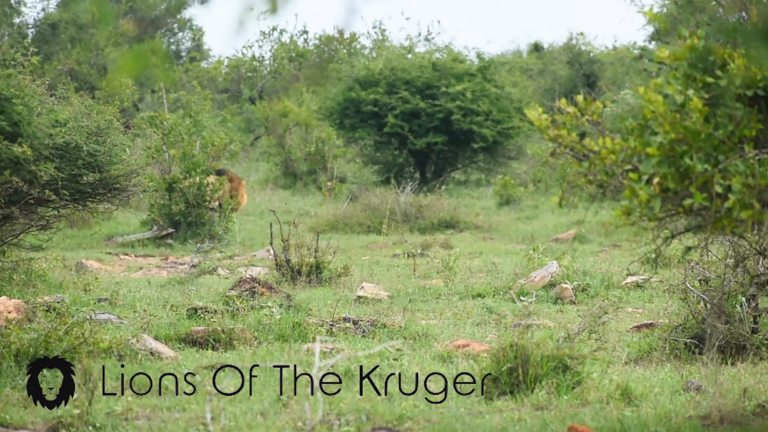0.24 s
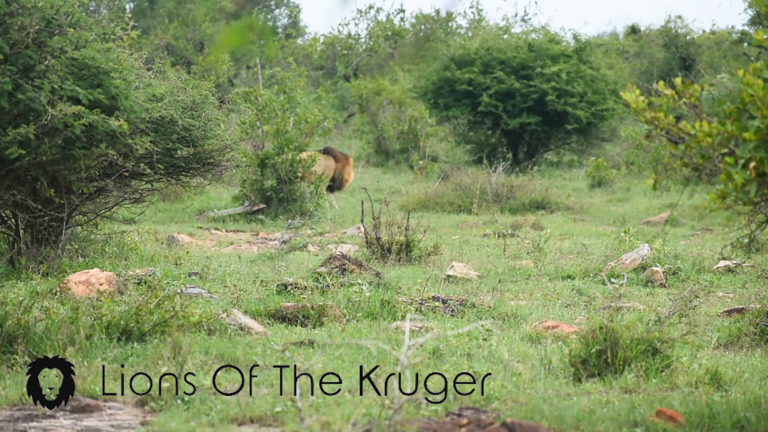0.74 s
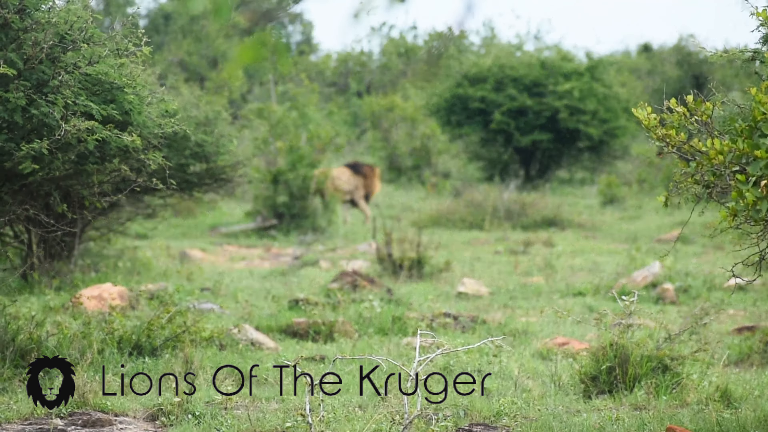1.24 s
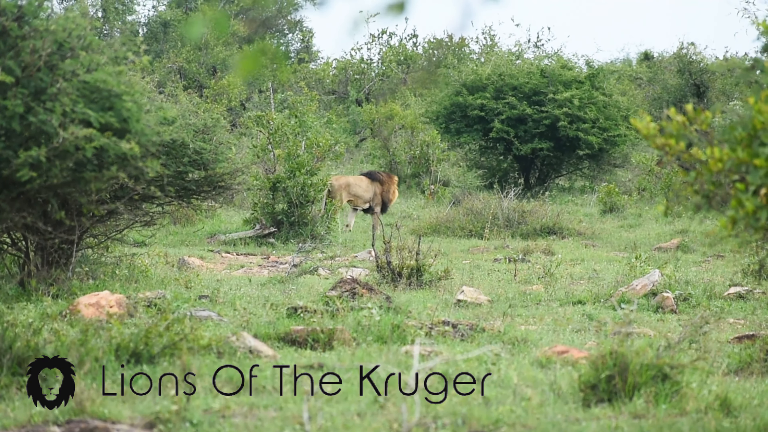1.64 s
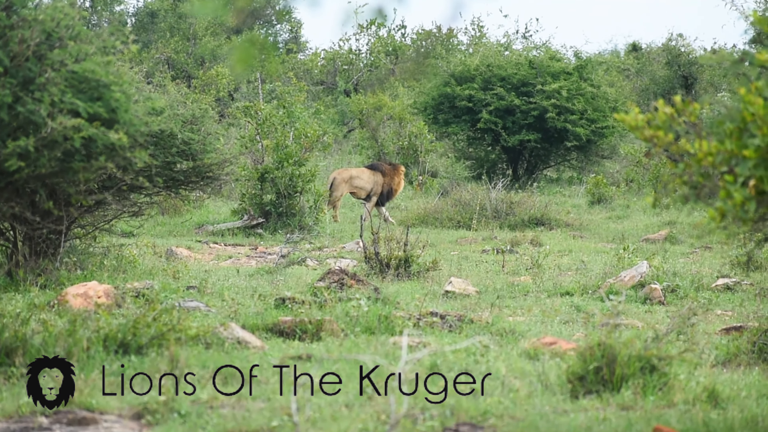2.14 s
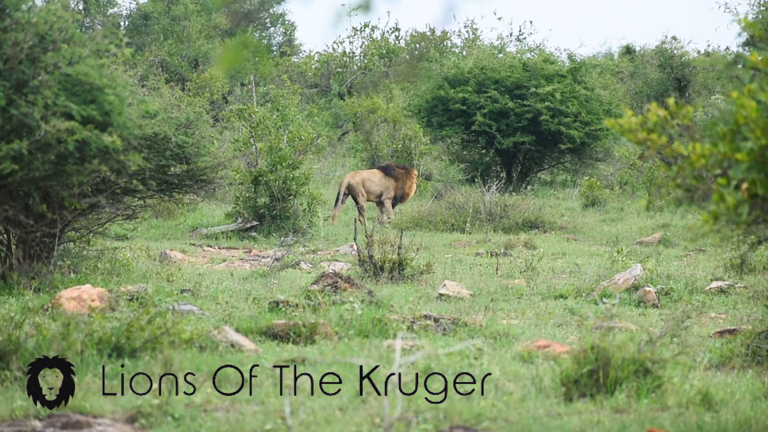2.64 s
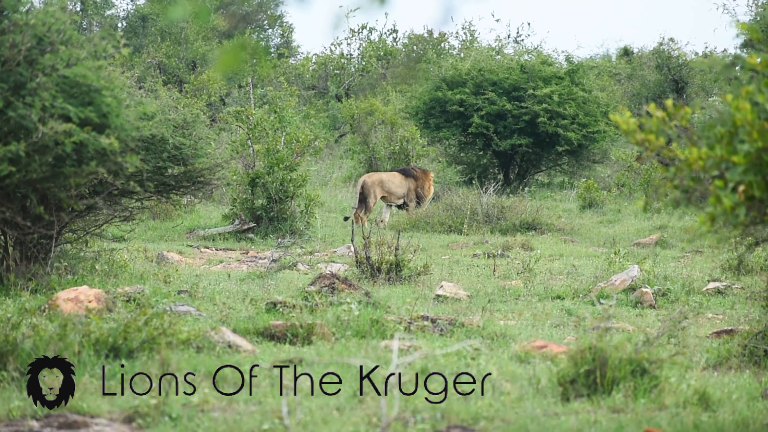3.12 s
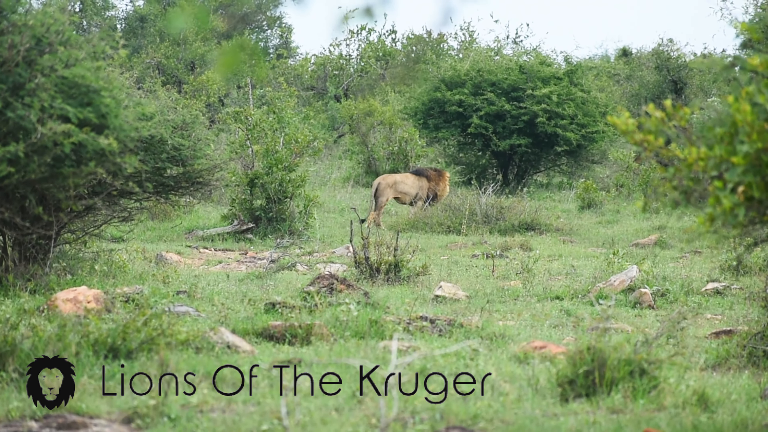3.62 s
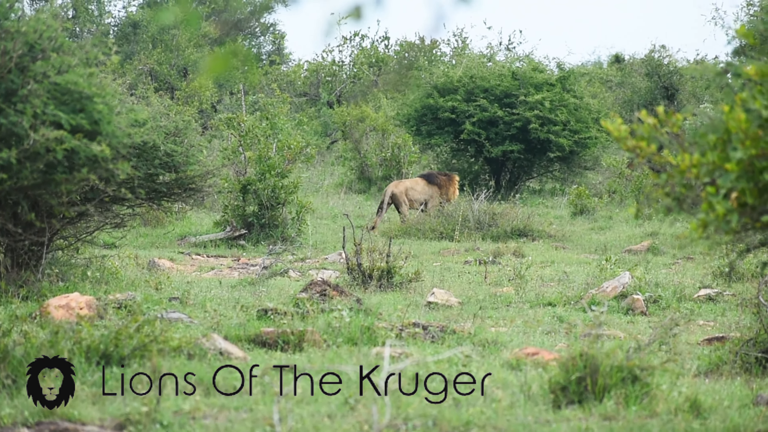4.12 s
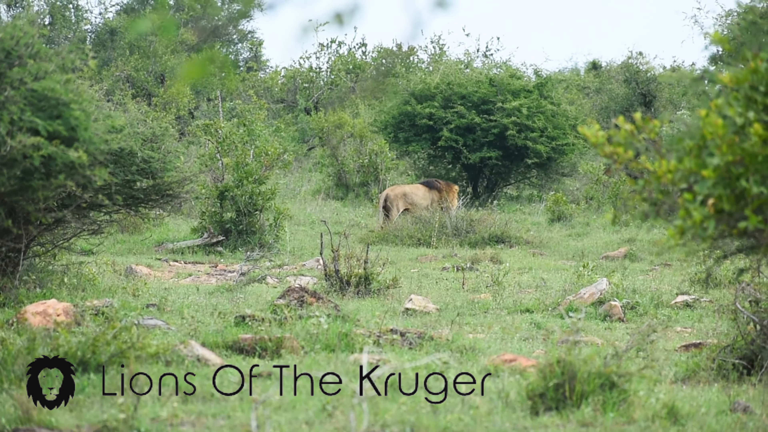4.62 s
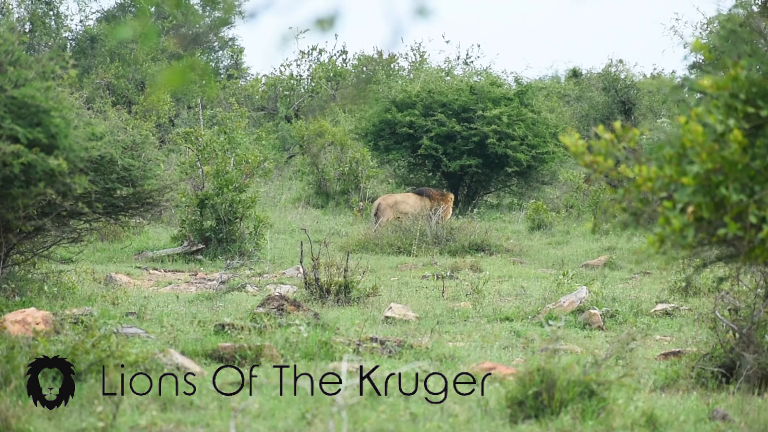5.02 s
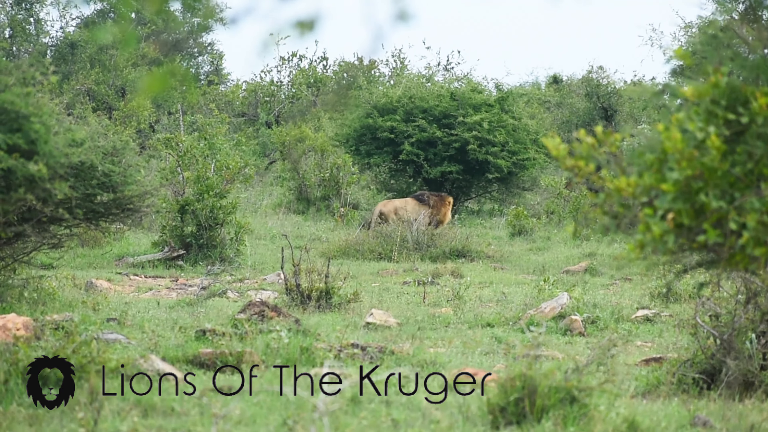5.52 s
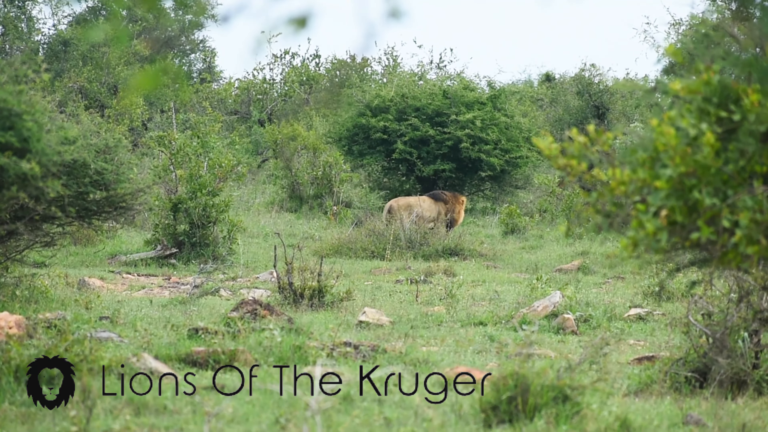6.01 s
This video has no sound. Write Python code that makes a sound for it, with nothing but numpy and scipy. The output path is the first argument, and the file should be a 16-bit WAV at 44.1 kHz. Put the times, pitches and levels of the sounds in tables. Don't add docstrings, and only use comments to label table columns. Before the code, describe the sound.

Open daytime bush on a small, hissy microphone in wind. A bright insect chirr throbs throughout, with a thin, higher cricket scraping double strokes about four times a second. Heavy low thumps open the scene; a hoarse bird slides downward, then a near bird gives five sharp chirps around two seconds. Dry wing snaps tick at random, faint birds whistle later, and wind bumps return at the end.

```python
import sys
import numpy as np
from scipy import signal
from scipy.fft import rfft, irfft, next_fast_len
from scipy.io import wavfile
from scipy.ndimage import uniform_filter1d

SR = 44100
rng = np.random.default_rng(int(sys.argv[2]) if len(sys.argv) > 2 else 0)


def undo_db(level):
    steps = np.asarray(level, float) / 20
    return 10 ** steps


def unload_wav(signal):
    wavfile.write(
        sys.argv[1],
        SR,
        np.round(np.clip(np.atleast_2d(signal).T, -1, 1) * 32767).astype(np.int16),
    )


N = 276198


def level(x, db):
    return x * undo_db(db) / np.sqrt(np.mean(x ** 2))


def curve(table):
    s, *columns = np.transpose(table)
    return [np.interp(np.arange(N) / SR, s, c) for c in columns]


def band(x, lo_hz, hi_hz, order=2):
    return signal.sosfilt(signal.butter(order, [lo_hz, hi_hz], "band", fs=SR, output="sos"), x)


def walk(rate):
    hold = int(SR / rate)
    steps = np.repeat(rng.standard_normal(N // hold + 1), hold)
    return 2.3 * uniform_filter1d(uniform_filter1d(steps, hold), hold)[:N]


def add(out, start, length, hz, db, turn, soft=1.67, fade=0, lean=1):
    u = np.linspace(0, 1, max(int(length * SR), 8))
    pitch = np.polyval(np.polyfit([0, .5, 1], hz, deg=2), u)
    shape = np.abs(np.sin(np.pi * u ** lean)) ** soft * (1 - fade * u ** 3)
    note = undo_db(db) * shape * np.sin(2 * np.pi * (np.cumsum(pitch) / SR + turn))
    at = int(start * SR) + np.arange(len(u))
    inside = (at >= 0) & (at < N)
    out[at[inside]] += note[inside]


def blips(table, cycles, glide, trim_db, lean=1, push=False):
    out = np.zeros(N)
    turns = rng.random(len(table))
    for (s, db, hz), turn, stretch in zip(table, turns, np.broadcast_to(cycles, len(table))):
        length = stretch / hz
        start = s - length * .5 ** (1 / lean)
        if push:
            turn = 1 / 4 - stretch / 2 * (1 + glide / 2)
        add(out, start, length, hz * np.array([1 + glide, 1, 1 - glide]), db + trim_db, turn, lean=lean)
    return out


def hiss():
    # f/Hz, level per Hz/dB
    spectrum = [(60, -18), (150, 2), (419, -1.5), (630, -3.5), (859, -4.5), (1020, -5.5), (1600, -8),
                (3210, -10.5), (4470, -9.5), (5220, -5), (6460, -12), (13200, -31), (15400, -37)]
    hz, db = np.transpose(spectrum)
    size = next_fast_len(N)
    bins = np.maximum(np.arange(size // 2 + 1) * SR / size, 1)
    tilt = undo_db(np.interp(np.log(bins), np.log(hz), db))
    return level(irfft(rfft(rng.standard_normal(size)) * tilt, size)[:N], -50)


def far_cricket():
    # t/s, peak/dB
    far_chirps = [(0.0238, -61), (0.2633, -65), (0.5018, -64), (0.7447, -63), (0.9994, -68), (1.2331, -62),
                  (2.809, -68), (3.5794, -67), (3.8043, -65), (4.0213, -64), (4.2767, -65), (4.5314, -66),
                  (4.7652, -66), (5.025, -64), (5.2739, -65), (5.4906, -65), (5.771, -65), (6.0122, -65)]
    dash, rustle, t = np.zeros(N), np.zeros(N), np.arange(N) / SR
    for s, db in far_chirps:
        dash += undo_db(db + 1.5) * np.exp(-((t - s - .032) / .042) ** 4)
        rustle += undo_db(db - 11.0) * np.exp(-((t - s - .03) / 0.15) ** 2)
    noise = rng.standard_normal((2, N))
    return dash * level(band(noise[0], 7240, 7550), 0) + rustle * level(band(noise[1], 7500, 7900), 0)


def glides(table, soft, arch_hz=0):
    out = np.zeros(N)
    for (s, length, first, last, db), turn in zip(table, rng.random(len(table))):
        add(out, s, length, (first, (first + last) / 2 + arch_hz, last), db, turn, soft=soft)
    return out


def whistle(table):
    hz, db = curve(table)
    return undo_db(db) * np.sin(2 * np.pi * np.cumsum(hz) / SR)


def clear_birds():
    # start t/s, length/s, peak/dB
    near_chirps = [
        (1.778, 0.025, -34.5),
        (1.911, .023, -30.5),
        (1.986, 0.029, -31.5),
        (2.155, 0.021, -31),
        (2.23, 0.026, -30.5),
    ]
    # start t/s, length/s, first f/Hz, last f/Hz, peak/dB
    arched = [
        (4.24, 0.2, 2560, 2790, -62),
        (4.641, 0.169, 2750, 2820, -57.5),
    ]
    # t/s, f/Hz, level/dB
    climb = [
        (5.595, 2250, -80),
        (5.612, 2400, -64),
        (5.645, 2780, -61),
        (5.68, 2900, -59),
        (5.705, 3070, -58),
        (5.73, 3300, -63),
        (5.75, 3400, -80),
    ]
    out = np.zeros(N)
    for (s, length, db), turn in zip(near_chirps, rng.random(len(near_chirps))):
        add(out, s, length, (5190, 4857, 4550), db, turn, soft=.8)
    return out + glides(arched, .3, arch_hz=140) + whistle(climb)


def far_birds():
    # start t/s, middle f/Hz, peak/dB
    chips = [(.827, 3800, -53), (2.341, 3950, -47), (3.24, 4400, -56), (3.275, 4300, -56),
             (3.29, 4000, -55), (3.673, 3780, -54), (3.73, 4110, -48), (3.739, 3740, -46.5),
             (4.492, 4200, -61), (5.68, 4150, -57), (5.725, 3770, -60), (5.84, 3400, -57),
             (5.773, 4050, -48), (5.783, 3800, -45), (5.832, 4070, -47), (5.841, 3800, -45),
             (5.788, 4050, -53), (5.79, 3600, -55), (5.846, 3950, -54)]
    # start t/s, length/s, first f/Hz, last f/Hz, peak/dB
    far_notes = [
        (0.662, 0.036, 3600, 3800, -55),
        (.642, .022, 4500, 3900, -61),
        (.71, .04, 4150, 4100, -61),
        (0.768, 0.014, 3830, 3700, -57),
        (0.785, 0.075, 2310, 2180, -59),
        (0.88, 0.025, 4100, 3630, -59),
        (5.762, 0.04, 3330, 3400, -58),
        (5.59, .03, 3370, 3330, -63),
    ]
    chip_s, fall = 0.014, 0.05
    chip_glides = [(s, chip_s, hz * (1 + fall), hz * (1 - fall), db) for s, hz, db in chips]
    return (glides(chip_glides, .8) + glides(far_notes, .8)) * undo_db(1.2 * walk(300))


def hoarse_bird():
    # start t/s, length/s, first f/Hz, last f/Hz, peak/dB
    hoarse_notes = [
        (0.126, 0.038, 3020, 2880, -53),
        (0.255, .07, 2000, 1900, -63),
        (.322, .045, 1980, 1700, -55),
        (.36, .1, 1600, 1480, -57),
        (.464, 0.034, 1110, 1100, -48.5),
        (.488, .024, 1030, 950, -51),
        (.503, .024, 880, 760, -54),
    ]
    # t/s, f/Hz, level/dB
    slide = [
        (.318, 1600, -70),
        (.335, 1530, -53.5),
        (.357, 1470, -53.5),
        (.372, 1375, -52),
        (.395, 1300, -53),
        (.425, 1290, -50.5),
        (.445, 1290, -53),
        (.462, 1300, -58),
        (.475, 1280, -80),
    ]
    return glides(hoarse_notes, .6) + whistle(slide)


def birds():
    far, hoarse = far_birds(), hoarse_bird()
    steady = clear_birds() + hoarse * (.9 + .3 * walk(260))
    t = np.arange(int(.08 * SR)) / SR
    bushes = rng.standard_normal(len(t)) * np.exp(-t / .015)
    bushes = bushes / np.linalg.norm(bushes)
    into_bushes = undo_db(-16) * steady + undo_db(-7) * hoarse + undo_db(-7) * far
    return steady + far + signal.fftconvolve(into_bushes, bushes)[:N]


def chirr():
    # t/s, level/dB, centre f/Hz
    crowd = [(0, -45.5, 5206), (.2, -47.5, 5250), (.4, -51.5, 5273), (.85, -49, 5040), (1.05, -57, 5114),
             (1.25, -46.5, 5330), (1.45, -51, 5220), (2.05, -47.5, 5183), (2.38, -51, 5150),
             (3.02, -47.5, 5270), (3.6, -47, 5230), (3.9, -52, 5200), (4.3, -50.5, 5360), (4.95, -50, 5210),
             (5.4, -55, 5184), (5.63, -48, 5460), (6.0, -54, 5280), (6.26, -59, 5130)]
    db, centre = curve(crowd)
    chance = rng.random((3200, 2))
    size, spread = np.clip(rng.standard_normal((len(chance), 2)).T, -2, 2)
    at = chance[:, 0] * (N - 1) / SR
    hz = centre[(at * SR).astype(int)] + 185 * spread
    grains = blips(np.c_[at, 3.1 * size, hz], 12 + 20 * chance[:, 1], 0.0033, 0, lean=.7)
    throb = np.sin(2 * np.pi * np.cumsum(13.2 + .8 * walk(3)) / SR)
    blur = band(rng.standard_normal(N), 1.3, 560, order=3) * np.cos(2 * np.pi * np.cumsum(centre) / SR)
    swing_db = 1.14 * walk(29.97) + 1.7 * throb + 0.86 * walk(6)
    return undo_db(db - 0.43 + swing_db) * (level(grains, -1.25) + level(blur, -4.0))


def strokes():
    # t/s, peak/dB, wing f/Hz
    beats = [(0.0507, -32, 5190), (0.121, -31.5, 5370), (0.1433, -30, 5330), (0.1948, -33, 5220),
             (0.229, -36, 5170), (0.3062, -45, 5270), (0.3466, -40, 5380), (0.365, -35, 5200),
             (0.4, -32, 5190), (0.441, -31, 5340), (0.4757, -28, 5400), (0.5217, -31.5, 5420),
             (0.554, -34.5, 5450), (0.6, -35.5, 5500), (0.6315, -32.5, 5400), (0.723, -38, 4860),
             (0.7711, -37, 4860), (0.833, -35, 5290), (0.8543, -41, 5150), (0.9148, -39, 4750),
             (0.963, -47, 5050), (1.0056, -41, 4870), (1.0241, -36, 5350), (1.074, -34, 5200),
             (1.0986, -32, 5370), (1.1404, -33.5, 5300), (1.1742, -33, 5360), (1.2131, -34.5, 5340),
             (1.2336, -34, 5100), (1.2875, -34, 5280), (1.3165, -34, 5480), (1.3728, -47, 5600),
             (1.4177, -53, 5280), (1.4421, -39, 4820), (1.4651, -40, 5290), (1.494, -35, 5300),
             (1.5412, -33, 5200), (1.572, -37, 5390), (1.5863, -33, 5240), (1.6117, -35, 5190),
             (1.6501, -31, 5260), (1.694, -37, 5170), (1.723, -36, 5300), (1.7654, -35, 5060)]
    # t/s, peak/dB, wing f/Hz
    lone = [
        (1.835, -30.5, 5020),
        (1.9764, -30, 5050),
        (2.0323, -39, 4970),
        (2.049, -30.5, 5190),
        (2.1964, -39, 5000),
    ]
    # t/s, peak/dB, wing f/Hz
    beats_on = [(2.3412, -35, 5260), (2.4194, -36, 5240), (2.4764, -43, 4870), (2.498, -32, 5260),
                (2.5727, -31, 5300), (2.62, -38, 5220), (2.651, -28, 5260), (2.688, -36, 5350),
                (2.7286, -27.5, 5260), (2.7907, -39, 4800), (2.7968, -38, 5240), (2.847, -47, 5040),
                (2.8655, -37, 4900), (2.9179, -36, 5190), (2.9373, -34, 5130), (2.9643, -40, 5150),
                (2.9847, -34, 5200), (3.0147, -33, 5300), (3.0645, -45, 5400), (3.0899, -42, 5310),
                (3.1284, -39, 5300), (3.1399, -37, 5260), (3.2711, -49, 5350), (3.3009, -47, 5120),
                (3.3125, -38, 5060), (3.3619, -42, 5230), (3.3873, -37, 5250), (3.434, -40, 5280),
                (3.4961, -37, 5170), (3.508, -29.5, 5270), (3.5322, -37, 5270), (3.5874, -34, 5400),
                (3.6065, -40, 5300), (3.6482, -41, 5230), (3.6866, -45, 5120), (3.7111, -45, 5200),
                (3.735, -37, 5320), (3.8293, -38, 5160), (3.8629, -39, 5310), (3.9805, -41, 5360),
                (4.061, -34, 5180), (4.0967, -43, 5570), (4.1216, -40, 5260), (4.1389, -34.5, 5470)]
    # t/s, peak/dB, wing f/Hz
    beats_late = [(4.217, -31, 5370), (4.2916, -32, 5420), (4.3235, -43, 4980), (4.361, -35, 5400),
                  (4.3957, -36, 4800), (4.4682, -34.5, 4770), (4.4956, -37, 5250), (4.5195, -40, 5340),
                  (4.5386, -34, 4800), (4.5766, -38, 5200), (4.598, -38, 4890), (4.6234, -33, 5240),
                  (4.6553, -41, 5050), (4.6922, -34, 5210), (4.773, -34, 5290), (4.8167, -53, 5290),
                  (4.8546, -33, 5300), (4.8967, -44, 5350), (4.9364, -29.5, 5380), (4.9746, -40, 5260),
                  (5.007, -34, 5430), (5.0602, -40, 5200), (5.1212, -41, 5380), (5.1472, -38, 5330),
                  (5.216, -42, 5280), (5.2744, -42, 5450), (5.3737, -50, 5000), (5.445, -40, 5270),
                  (5.4864, -36, 5400), (5.535, -34.5, 5470), (5.5822, -48, 5640), (5.6127, -36, 5380),
                  (5.6341, -38, 5450), (5.657, -43, 5620), (5.687, -34, 5460), (5.7254, -38, 5460),
                  (5.7583, -42, 5310), (5.8092, -34.5, 5350), (5.8441, -37, 5340), (5.8634, -36, 5330),
                  (5.8895, -40, 5330), (5.9289, -38, 5360), (5.9558, -34.5, 5300), (6.0327, -37, 5200),
                  (6.109, -36, 5270), (6.1594, -45, 5120), (6.2187, -42, 5350), (6.2343, -36, 5270)]
    late_by = [.002, 0, 0]
    return blips(np.vstack([beats, lone, beats_on, beats_late]) + late_by, 31, 0.013, -1.4, lean=.5)


def snaps():
    # t/s, low ring peak/dB, high ring/dB, low ring f/Hz
    wing_snaps = [(0.9747, -43, -70, 3900), (1.0286, -42, -55, 4390), (1.1545, -39, -53, 3460),
                  (2.453, -39.5, -42, 3620), (2.5138, -33.5, -47, 4465), (2.7913, -38.5, -50, 3750),
                  (2.947, -47, -57, 4100), (2.975, -48, -70, 3810), (2.987, -46, -70, 3760),
                  (2.995, -43, -70, 3850), (3.064, -42, -58, 3940), (3.1386, -45, -54, 3960),
                  (3.3924, -43, -67, 4200), (3.8044, -41.5, -39.5, 4074), (3.852, -44, -61, 4180),
                  (3.8636, -39, -43, 4470), (3.8724, -34.5, -46, 4300), (3.9898, -38, -46, 4350),
                  (4.638, -41.5, -65, 3950), (4.7027, -43, -57, 3700), (5.083, -35.5, -47, 3770),
                  (5.149, -38, -47, 4360), (5.217, -36.5, -46, 4330), (5.2742, -37, -48, 3660),
                  (5.391, -42, -55, 3670), (5.643, -41, -64, 4450), (5.9374, -50, -65, 3890)]
    out, t = np.zeros(N), np.arange(int(0.014 * SR)) / SR
    for (s, db, high_db, hz), noise in zip(wing_snaps, rng.standard_normal((len(wing_snaps), len(t)))):
        low = undo_db(db + 9.5) * np.exp(-t / 0.00059) * np.sin(2 * np.pi * hz * t)
        high = undo_db(high_db + 17.5) * np.exp(-t / 0.00096) * np.sin(2 * np.pi * 7600 * t)
        crack = undo_db(min(db, high_db + 10) + 5) * np.exp(-t / .0006) * np.sin(2 * np.pi * 5800 * t)
        scatter = undo_db(min(db, high_db + 16) + 0.5) * np.exp(-t / 0.0051) * noise
        out[int(s * SR):int(s * SR) + len(t)] += low + high + crack + scatter
    return band(out, 3490, 6800, order=3)


def cricket():
    # last stroke t/s, lead tick under the chirp/dB
    chirps = [(0.059, -20), (0.297, -8), (0.541, -9), (0.785, -8), (1.029, -20), (1.269, -12), (1.511, -24),
              (1.759, -11), (2.0, -7), (2.247, -8), (2.49, -5), (2.732, -19), (2.976, -12), (3.224, -22),
              (3.466, -11), (3.711, -11), (3.953, -6), (4.197, -7), (4.441, -12), (4.684, -9), (4.924, -6),
              (5.163, -8), (5.404, -6), (5.644, -24), (5.884, -7), (6.125, -8)]
    warm_up = [0, 2.0]
    out = np.zeros(N)
    for (s, lead_db), turn in zip(chirps, rng.random((len(chirps), 2))):
        middle = np.interp(s, warm_up, (.012, .0192))
        db = np.interp(s, warm_up, (-46, -44.6))
        begin = s - .0068 - middle
        middle_hz = [7115 - 2.5 / middle, 7270 - 1.5 / middle, 7070]
        add(out, s - .001, .0275, [7100, 7200, 6760], db + 3.5, turn[0], soft=0.57, fade=0.61)
        add(out, begin - .001, middle + .0015, middle_hz, db + 1.5, turn[1], soft=.3)
        add(out, begin - .014, .007, [6850, 6930, 6900], db + lead_db + 3, turn[0], soft=.7)
    return out


def wind_swells():
    # t/s, peak/dB, f/Hz
    pushes = [(.038, -13.5, 70.4), (.058, -28, 90.5), (.106, -15, 101), (.217, -21, 81), (.246, -17.5, 93),
              (.27, -26, 85), (.305, -26, 90), (.362, -25, 99.5), (.51, -26, 95), (.534, -43, 87),
              (.644, -27.5, 50.6), (.796, -21.5, 75), (1.239, -30.5, 77), (1.822, -15.5, 86.6),
              (1.838, -21.5, 105), (1.898, -24, 91.5), (2.943, -23.5, 70.94), (2.962, -20.5, 80.4),
              (2.986, -22, 103), (3.02, -26, 87), (4.686, -26, 80.7), (4.711, -22.5, 58),
              (5.478, -25.5, 43.4), (5.51, -23, 43.6), (5.537, -20.5, 81.5), (5.911, -19.5, 74),
              (5.966, -24, 93), (5.997, -21, 70), (6.041, -19.5, 74.5), (6.108, -22.5, 86),
              (6.142, -18, 95)]
    # t/s, peak/dB
    puffs = [(0.571, -37), (0.769, -33), (0.872, -32.5), (.896, -34), (.99, -43), (1.661, -44.5),
             (1.873, -28), (1.914, -32), (1.96, -47), (2.0, -54), (2.905, -38), (3.05, -45), (5.45, -36),
             (5.57, -42), (5.88, -38), (3.699, -49), (3.921, -38.5), (5.42, -44), (5.6, -48), (2.07, -44.5),
             (2.29, -35), (2.479, -46), (2.67, -47), (3.419, -45), (3.798, -44), (3.983, -35.5),
             (4.087, -31.5), (4.133, -32), (4.168, -35.5), (4.272, -36), (4.35, -30.5), (4.794, -29.5),
             (5.069, -44), (5.182, -35), (5.3, -41.5), (5.73, -45.5), (6.161, -38), (6.223, -32.5)]
    puff_hz = 66.2
    return blips([*pushes, *((s, db, puff_hz) for s, db in puffs)], 1.78, 0.3, 0.93, push=True)


def wind_flicks():
    # t/s, peak/dB, f/Hz
    eddies = [(.025, -26, 202), (.037, -22, 215), (.0485, -8, 242), (.0585, -10.5, 156), (.071, -9.5, 190),
              (.106, -10.5, 182), (.116, -22.5, 174), (.246, -19, 200), (.255, -21, 185),
              (.289, -32.5, 168), (.365, -41.5, 188), (.519, -8.5, 207), (.511, -37, 150),
              (.54, -31.5, 149), (.552, -33.5, 119), (.795, -36.5, 167), (1.237, -44, 187),
              (1.821, -26, 146.4), (1.847, -34, 187), (1.89, -37.5, 189.5), (2.964, -25, 161),
              (2.994, -38, 184), (3.013, -32, 215), (4.722, -27.5, 159), (5.527, -25.5, 251),
              (5.544, -30, 190), (5.554, -30.5, 140), (5.503, -33, 140), (5.44, -43.5, 129.6),
              (5.925, -35, 110), (5.91, -35, 151), (5.964, -27, 193), (5.985, -24.5, 155),
              (6.014, -31, 170.5), (6.027, -34, 113), (6.108, -50, 140), (6.119, -29, 131),
              (6.132, -25, 173), (6.142, -39, 140)]
    # t/s, peak/dB, f/Hz
    cracks = [(.047, -16.5, 470), (.047, -54, 900), (.066, -27.5, 516), (.068, -36, 750), (.11, -27.5, 410),
              (.11, -38, 760), (.247, -33, 424), (.519, -23, 327), (2.966, -40, 364), (3.013, -58, 400),
              (5.527, -40, 445), (6.132, -38.5, 383)]
    flicks = blips(eddies, 2.09, 0.0077, 4.4, push=True)
    edges = blips(np.multiply(eddies, [1, 1, 1.7]), 1.53, 0.17, -20, push=True)
    return flicks + edges + blips(cracks, 3.29, 0.036, 0.84)


def wind():
    # t/s, level/dB
    gusts = [(0, -24), (.14, -49), (.45, -44.5), (.75, -39.5), (1.0, -50), (1.3, -62), (1.45, -64),
             (1.75, -63), (2.3, -52), (2.8, -59.5), (3.22, -62), (3.45, -55.5), (4.2, -58), (4.5, -51),
             (4.9, -50), (5.65, -68), (6.0, -42), (6.26, -41)]
    db, = curve(gusts)
    rumble = level(band(rng.standard_normal(N), 27.2, 57.2), 0)
    rumble = rumble + level(band(rng.standard_normal(N), 64.4, 147.0, order=3), -9.5)
    swells = wind_swells()
    wake_s, lead = 0.042, int(.03 * SR)
    power = signal.fftconvolve(swells ** 2, np.hanning(int(2 * wake_s * SR)))[lead:lead + N]
    wake = undo_db(-9) * np.sqrt(np.abs(power) / (wake_s * SR))
    return (undo_db(db) + wake) * undo_db(2.0 * walk(24.87)) * rumble + swells + wind_flicks()


def scene():
    insects = far_cricket() + chirr() + strokes() + snaps() + cricket()
    return (hiss() + birds() + insects + wind())[None]


def band_limit(x):
    return signal.sosfilt(signal.butter(12, 15600, fs=SR, output="sos"), x)


def record(dry):
    top = signal.ellip(8, .2, 60, 15450, fs=SR, output="sos")
    rounded = 1.14 * np.tanh(dry / 1.294)
    return band_limit(signal.sosfilt(top, rounded))


dry = scene()
out = record(dry)
unload_wav(out)
```